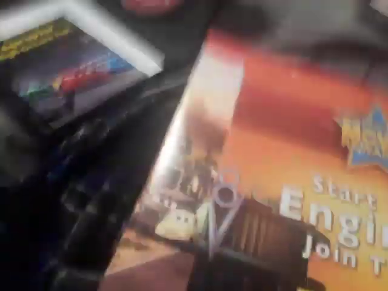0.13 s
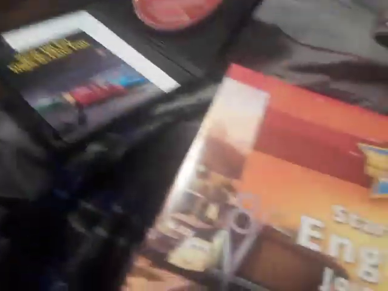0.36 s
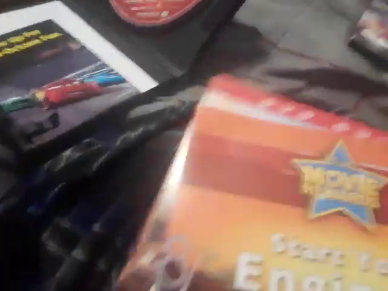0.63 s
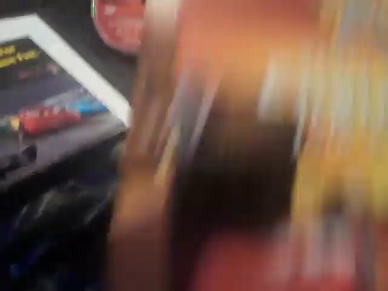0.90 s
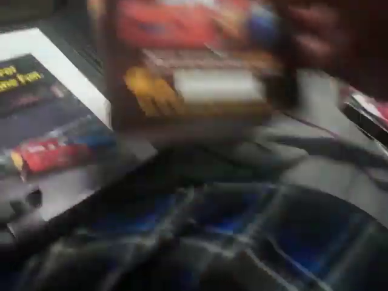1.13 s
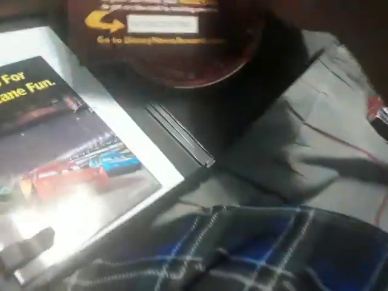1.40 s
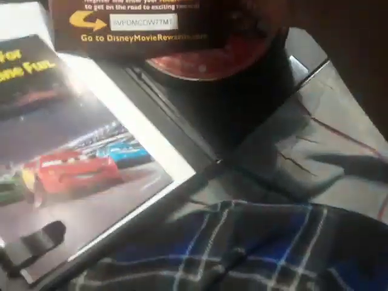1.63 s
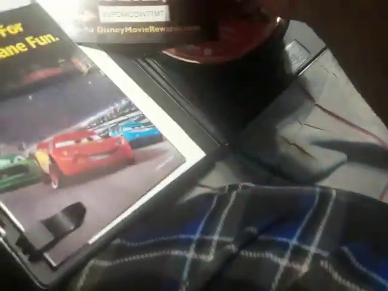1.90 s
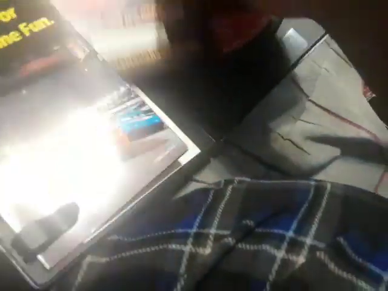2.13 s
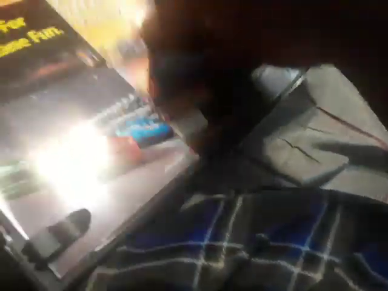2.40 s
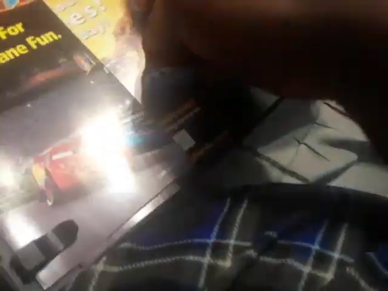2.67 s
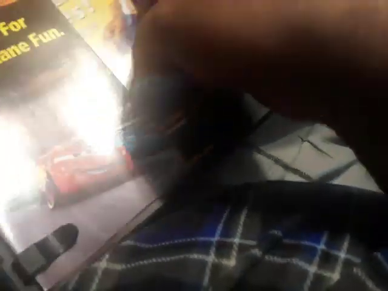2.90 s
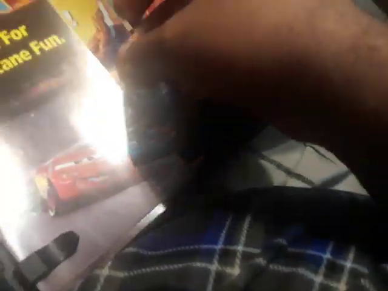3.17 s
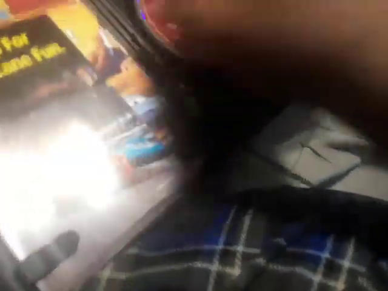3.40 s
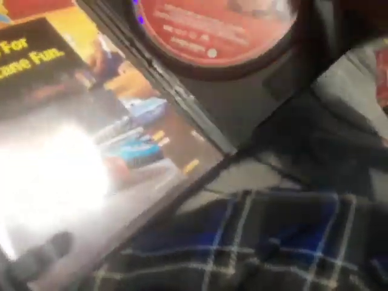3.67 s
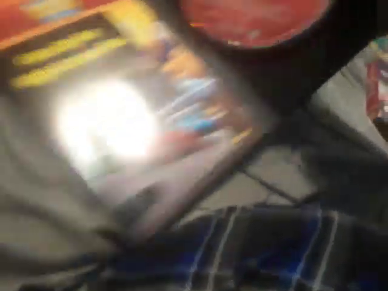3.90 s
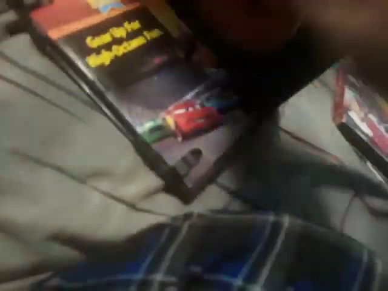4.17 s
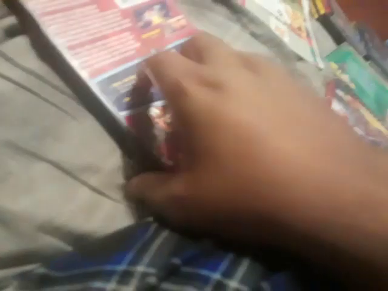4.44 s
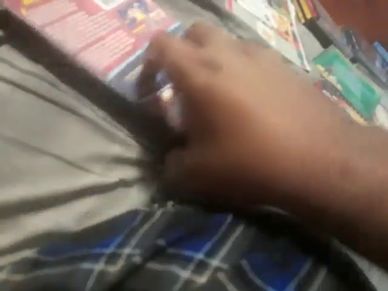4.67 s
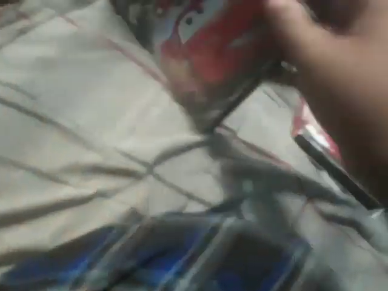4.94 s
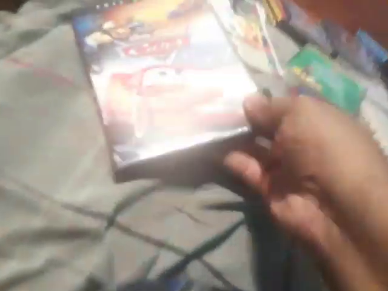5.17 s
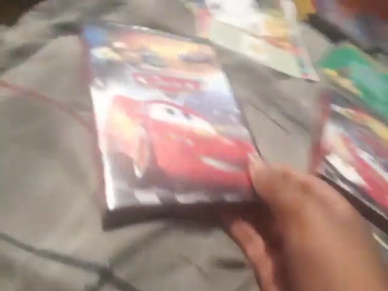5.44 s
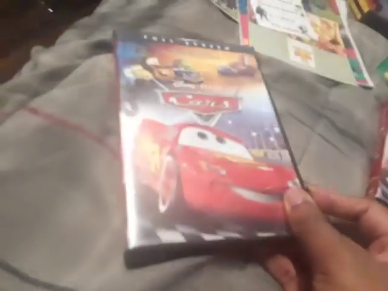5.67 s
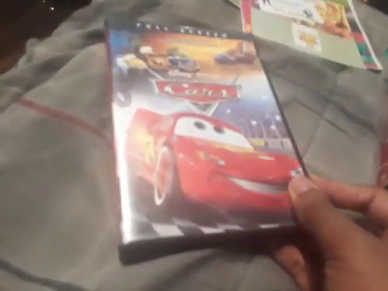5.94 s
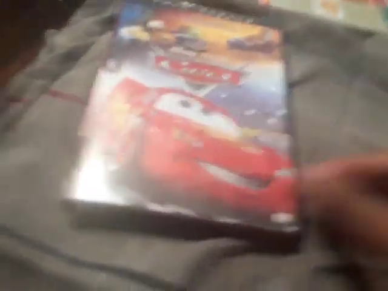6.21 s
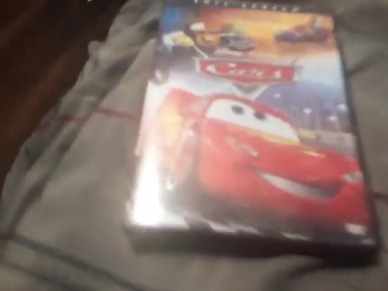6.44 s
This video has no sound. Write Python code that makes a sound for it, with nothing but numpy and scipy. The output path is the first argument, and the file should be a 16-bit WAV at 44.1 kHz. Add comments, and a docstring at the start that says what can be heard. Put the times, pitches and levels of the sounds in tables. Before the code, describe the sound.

Close-up plastic case handling indoors: low thumps, papery rustles, a dense flurry of clicks, one loud snap, then near quiet over faint hiss and whine.

```python
"""Paper hisses and a plastic case rattles as hands slide glossy inserts into it on a bed, then snap it shut.
Paper, cloth and rubbing are shaped noise; taps, scrapes and snaps are short noises ringing the case.
Fingers thump the camera body and the bed with low, sagging tones; a small furnished room answers.
The camera's left microphone faces the hands; the right one carries a thin wandering whine over hiss."""
import sys
import numpy as np
from scipy import signal
from scipy.fft import rfft, irfft, next_fast_len
from scipy.io import wavfile
from scipy.ndimage import uniform_filter1d, map_coordinates

SR = 44100
rng = np.random.default_rng(int(sys.argv[2]) if len(sys.argv) > 2 else 0)


def master_out(mix):
    """Clip the mix to full scale and print it as 16-bit PCM to the path in sys.argv[1]."""
    frames = np.transpose(np.atleast_2d(mix))
    ceiling = np.clip(frames, -1, 1)
    pcm = np.round(ceiling * 32767).astype(np.int16)
    wavfile.write(sys.argv[1], SR, pcm)


def linear_from_db(decibels):
    """Turn decibels (scalar or array-like) into linear amplitude factors; 0 gives 1."""
    return 10 ** (np.asarray(decibels, float) / 20)


N = 289806  # samples in the scene
HIT = 2048  # samples of one tap

# The hands at work; levels glide between rows, before the microphone's colour.
# Each row: time in seconds, cloth rumble in dB, rubbing of the case in dB.
HAND_LEVELS = [(0.0, -60.5, -74), (0.05, -46, -56.5), (0.09, -47, -51), (0.15, -43.5, -61),
               (0.175, -59, -63.5), (0.21, -45.5, -56), (0.24, -55.5, -68), (0.33, -63, -81),
               (0.53, -57.5, -64), (0.75, -56.5, -52), (0.95, -50, -60.5), (1.1, -68.5, -74.5),
               (1.46, -59.5, -61.5), (1.99, -57, -71), (2.34, -68, -59), (2.75, -65.5, -57),
               (3.1, -65.5, -58), (3.35, -58.5, -51.5), (3.65, -68.5, -84), (4.01, -68.5, -63),
               (4.22, -60, -60.5), (4.27, -52, -52), (4.34, -52, -51), (4.52, -58, -55.5),
               (4.68, -57.5, -52), (4.74, -68, -61), (4.8, -62.5, -63.5), (4.85, -75.5, -67),
               (5.02, -65, -72.5), (5.11, -80, -80), (5.5, -79.5, -88), (6.15, -81.5, -85), (6.3, -60, -78),
               (6.44, -75.5, -83), (6.57, -94, -74.5)]
# Paper strokes. Each row: start in seconds, rise in seconds, hold in seconds, level of the hold in dB.
PAPER_STROKES = [(0.031, 0.03, 0.082, -47.5), (0.293, .01, 0.046, -59.5), (0.451, 0.094, .01, -55.5),
                 (0.588, 0.011, 0.096, -48), (0.719, 0.027, 0.15, -47.5), (0.996, 0.02, 0.045, -49.5),
                 (1.209, 0.021, 0.0069, -54.5), (1.274, 0.024, 0.027, -59), (1.53, 0.0072, 0.12, -55.5),
                 (1.67, .03, 0.0079, -54), (1.724, 0.027, 0.041, -46), (1.845, 0.04, 0.019, -52),
                 (1.922, 0.11, 0.072, -52.5), (2.126, .045, .12, -45), (2.31, 0.062, 0.054, -43.5),
                 (2.446, 0.038, 0.0093, -41.5), (2.556, 0.043, 0.049, -45), (2.719, 0.017, 0.0046, -40),
                 (2.883, 0.047, .04, -42), (3.014, 0.025, 0.0074, -43), (3.312, 0.037, .01, -37.5),
                 (3.388, 0.039, 0.023, -49), (3.467, .01, 0.032, -58.5), (3.68, 0.029, 0.012, -57),
                 (3.801, 0.23, 0.022, -51), (4.164, 0.012, 0.031, -74.5), (4.234, .03, 0.063, -39),
                 (4.416, .018, 0.049, -45.5), (4.491, .01, 0.064, -58.5), (4.58, 0.083, .01, -46.5),
                 (4.8, 0.098, 0.23, -58), (5.45, 0.013, 0.0068, -65), (6.0, 0.073, 0.23, -61.5)]
# Taps and clicks on the case. Each row: start in seconds, peak of the case's ring in dB,
# strongest ring in Hz, low knock in dB and bright crack in dB, both against that ring.
CASE_TAPS = [(0.106, -33.5, 900, -14.5, -15.5), (0.116, -39.5, 1500, -7.5, -1),
             (0.2133, -42, 7110, -31.5, 19), (0.254, -39.5, 7110, -32, 0.5), (0.3198, -40.5, 849, -18, 4.5),
             (0.339, -45.5, 1300, 3.5, -12), (0.68, -29, 2105, -31.5, -9.5),
             (0.689, -42, 2099, -30.5, -4.5), (0.7289, -33, 2000, -12.5, -16.5),
             (1.064, -33.5, 1707, -12, -4), (1.5703, -38.5, 2344, -12.5, -4), (1.7445, -36, 1800, -4, 1),
             (2.161, -51.5, 7110, -32.5, 9.5), (2.207, -44.5, 4490, -31, 5),
             (2.334, -38.5, 1340, -13, -3.5), (2.3536, -24.5, 2268, -19, -22.5),
             (2.372, -22, 1260, -22, -27), (2.4197, -31.5, 2320, -41.5, -10),
             (2.4798, -34.5, 1836, -16, 4.5), (2.4893, -27, 4490, -5.5, 3.5), (2.619, -31, 3510, -40, -22),
             (2.6654, -24.5, 2240, -20.5, -12), (2.7381, -31, 1786, -42.5, -7),
             (2.7457, -24.5, 1910, -26, -4.5), (2.755, -31, 4490, -29.5, -11.5),
             (2.9108, -26.5, 1883, -26.5, -33), (2.983, -29, 1910, -14.5, -24),
             (3.238, -41, 1880, -20, -20), (3.2524, -36.5, 1720, -8.5, -26),
             (3.273, -35, 1800, -15.5, -21.5), (3.277, -34, 1900, -17.5, -17), (3.295, -33, 2110, -15, -12),
             (3.323, -27.5, 1875, -14, -21), (3.3648, -25, 1820, -18, -0.5),
             (3.402, -34.5, 1800, -19.5, -6.5), (3.427, -28.5, 1520, -28.5, -7.5),
             (3.4462, -28, 1730, -10.5, -21.5), (3.642, -21.5, 2266, -19.5, -20.5),
             (3.6522, -23, 2269, -11.5, -7.5), (3.733, -24, 2230, -11, -33.5),
             (4.245, -25, 1044, -12.5, -18.5), (4.2531, -18, 1700, -11, -23.5),
             (4.285, -19, 1300, -13, -15), (4.2883, -19, 1502, -14.5, -12),
             (4.2927, -18.5, 1143, -13, -12.5), (4.2984, -25, 3173, -15, 3), (4.332, -28.5, 1650, -9, -0.5),
             (4.4019, -19, 1300, -16, 2.5), (4.406, -18.5, 950, -15.5, -4.5), (4.411, -24, 1700, -15, -7),
             (4.4331, -23, 1007, -14.5, -7.5), (4.439, -26, 950, -15.5, -20.5),
             (4.47, -34, 950, -11.5, -13), (4.4755, -28, 920, -8, -9), (4.484, -28.5, 950, -19.5, -19.5),
             (4.582, -39, 2056, -21, -20.5), (4.6037, -35.5, 942, -12, -24), (4.701, -30, 951, -18, -13.5),
             (4.784, -44.5, 884, -20.5, -26.5), (4.884, -38, 934, -30.5, 1),
             (4.888, -36.5, 949, -20.5, -23), (4.9724, -38, 963, -16.5, -22), (5.063, -45, 950, -23, -27),
             (5.396, -41.5, 1603, -45, 9), (5.486, -58, 2316, -28, -21), (5.548, -57, 1720, -40, -24),
             (5.5675, -47, 1458, -41, -21), (6.2, -50.5, 1905, -34, 9), (6.2454, -36.5, 2120, -25.5, -42.5)]
# Short scrapes of edges and the case, and small soft knocks near 950 Hz. Each row: start in seconds,
# length in seconds, level before the swell in dB, strongest ring in Hz, treble against the ring in dB.
SCRAPES_AND_KNOCKS = [(0.564, 0.2, -49, 6670, -13.5), (0.812, 0.018, -40, 1740, -13.5),
                      (1.011, 0.041, -52, 1784, 11.5), (1.751, 0.045, -44.5, 1953, 0),
                      (2.458, 0.05, -42.5, 1770, -16.5), (2.569, .056, -51, 2380, 1),
                      (2.74, 0.015, -37.5, 4482, 5), (2.894, 0.089, -42.5, 1820, 3.5),
                      (3.017, 0.055, -40, 1880, 1), (3.258, 0.058, -44, 1917, -5.5),
                      (3.328, 0.042, -31, 1705, -4), (3.375, 0.033, -42, 1743, -15.5),
                      (3.417, 0.045, -40.5, 2375, -1), (3.43, 0.036, -39.5, 3567, -7),
                      (4.256, 0.062, -31, 1466, -11), (4.316, 0.017, -31, 1760, 2.5),
                      (4.327, 0.017, -29.5, 1680, -33.5), (4.405, 0.019, -29.5, 981, -18),
                      (4.429, 0.022, -32, 993, -15), (4.463, 0.034, -34.5, 1312, -5.5),
                      (4.541, 0.032, -44.5, 950, -22), (4.651, 0.021, -45, 950, -17.5),
                      (4.904, 0.019, -48, 950, -25.5), (5.01, 0.022, -50.5, 950, -22)]
# Bands of noise that glide, swell and fade: rubbed edges, sliding paper, cloth, a snap's tail.
# Each row: start in seconds, length in seconds, level before swell and fade in dB, first pitch in Hz,
# pitch it heads for in Hz, width in Hz, swell in seconds, fade in seconds.
NOISE_BANDS = [(0.421, 0.53, -56.5, 2155, 2104, 550.6, .067, 0.11),
               (.59, 0.1, -56, 5600, 5470, 600, 0.0096, 0.037),
               (.6, 0.091, -54, 6600, 7330, 901, 0.0083, 0.026),
               (.73, 0.11, -57.5, 5300, 5935, 449, .03, 0.023),
               (.735, 0.065, -56.5, 6800, 6870, 600, .02, 0.014),
               (.76, .14, -57, 8300, 7510, 800, 0.025, 0.035),
               (2.15, 0.19, -54, 4100, 4600, 600, .015, 0.049),
               (2.16, .14, -55.5, 7300, 7380, 448, 0.039, 0.026),
               (2.34, .08, -63.5, 6600, 6600, 397.3, 0.025, 0.038),
               (2.735, .03, -44.5, 4400, 4390, 500.4, 0.0081, 0.011),
               (2.9, .06, -49.5, 4300, 4430, 694.6, .01, 0.037),
               (3.335, 0.032, -43.5, 4700, 4860, 400, 0.0081, 0.009),
               (3.449, 0.12, -60.5, 2010, 2014, 299, 0.067, 0.066),
               (4.49, .2, -54.5, 380, 327.6, 350, 0.024, 0.0463),
               (4.97, 0.097, -59, 350, 350, 300, 0.011, .04),
               (4.5, 0.36, -57.5, 2055, 2043, 281.5, 0.061, 0.14),
               (5.8, 0.1467, -49.5, 2300, 2030, 1390, 0.0092, 0.17),
               (5.803, 0.13, -59, 7900, 7700, 907, .005, .11),
               (5.807, 0.012, -38.5, 2020, 2027, 296, .005, 0.0057),
               (6.2445, 0.061, -41, 2250, 1810, 553.4, 0.0012, 0.029),
               (6.25, 0.16, -46, 3700, 3338, 270, .05, 0.12),
               (6.25, .14, -52, 3300, 3000, 2000, 0.025, 0.0827),
               (6.288, 0.1, -54, 2050, 2050, 300, 0.021, 0.05)]
# Sharp snaps. Each row: start in seconds, near peak in dB, tilt in dB an octave, rattle t60 in seconds,
# peak sent into the room in dB, strongest ring in Hz, boost of that ring in dB.
CASE_SNAPS = [(0.186, -19, -3, .006, -53, 1210, 11), (0.2174, -13.5, -2, 0.016, -48, 1740, 3),
              (0.7362, -28, -3.5, 0.0052, -50, 1918, 6), (0.904, -18.5, -2.3, .005, -47, 2036, 9),
              (1.5423, -27, -2.8, .008, -49.5, 2200, 14), (3.0275, -23, -6, 0.0054, -52, 1190, 11),
              (5.1487, 6.5, 0, 0.0092, 12, 4530, 6), (5.796, -7.5, -0.5, 0.01, -17, 1590, 5.5)]
# Soft thumps on the camera body and the bed. Each row: start in seconds, level before the bass cut in dB,
# pitch it sags to in Hz, left over right in dB, t60 in seconds.
SOFT_THUMPS = [(0.025, -5, 239.8, 22.5, 0.023), (0.03, -22, 108.4, 14, 0.084), (0.044, -26, 203, 13, 0.012),
               (0.053, -11.5, 147.7, 26, 0.066), (0.05, -26, 422, 11.5, 0.038),
               (0.065, -28, 297.2, 11, 0.047), (0.081, -27.5, 348, 24, 0.064),
               (0.102, -34.5, 247, 16, 0.028), (0.117, -23, 375, 16.5, 0.047),
               (0.13, -3.5, 173.5, 9.5, 0.037), (0.133, -14, 104.5, 11.5, 0.061),
               (0.14, -24, 474, 8, 0.033), (0.145, -17.5, 278.1, 3, 0.048), (0.153, -10, 170.2, 11, 0.044),
               (0.186, -11, 278, -1.5, 0.028), (0.197, -26, 170.7, 2.5, 0.063),
               (0.208, -24, 190, 5.5, 0.04014), (0.214, -20, 380.2, 5.5, 0.02226),
               (0.349, -38.5, 164, 7, 0.061), (0.853, -11.5, 297.4, 30, 0.016),
               (0.936, -36.5, 149.2, 3.5, 0.056), (1.026, -31, 195.8, 2.5, .05),
               (2.492, -36.5, 211, 18.5, 0.056), (2.986, -38, 208, 10.5, 0.051),
               (3.337, -43.5, 379.2, 7, .054), (3.737, -36.5, 334.6, 9.5, 0.043),
               (4.259, -34, 309, 20, 0.048), (4.281, -20, 180, 13, 0.065), (4.475, -36.5, 250, 6.5, 0.038),
               (4.545, -39.5, 322.7, 12, 0.042), (4.646, -37.5, 251.8, 8.5, 0.048),
               (4.985, -45, 350, 10, 0.044), (5.0, -49.5, 328, 10.5, 0.041), (5.02, -47.5, 387, 2, .05),
               (5.156, -28, 322.6, 10, 0.063), (5.46, -53, 147.2, 0.5, 0.055),
               (5.654, -38, 154.6, 35, 0.043), (6.245, -37, 158.9, 13, 0.031), (6.27, -36, 126, 25, 0.047)]
# What the case rings with. Each row: pitch in Hz, width in Hz, level in dB.
CASE_MODES = [(950, 160, 0.5), (1300, 250, -3), (1700, 270, -1), (2240, 250, 0.5), (2538, 460, -5),
              (3173, 262, -5), (3813, 430, -5), (4490, 510, -7), (5090, 470, -8.5), (7110, 1400, -13)]
# Colour of the paper's hiss. Each row: frequency in Hz, level in dB per Hz.
PAPER_COLOUR = [(600, -44.5), (1500, 2.5), (3000, -1.5), (5000, -2), (8000, 1.5), (12000, 0.5), (16000, -8)]
# Colour of the cloth's rumble. Each row: frequency in Hz, level in dB per Hz.
CLOTH_COLOUR = [(25, -47.5), (60, -12.5), (130, -2), (300, -6.5), (480, -8), (700, -16), (1500, -35)]
# Colour of a snap up close, before its tilt and boost. Each row: frequency in Hz, level in dB per Hz.
SNAP_NEAR_COLOUR = [(60, -53), (150, -30), (400, -34.5), (800, 1), (1300, 1), (2200, 4), (2700, -2),
                    (3050, 4.5), (3500, -7), (4470, 3), (5400, -9), (7300, 4.5), (8500, -7), (10500, -8.5),
                    (12500, 0), (16000, 0)]
# Colour of a snap as the room receives it, before tilt and boost. Each row: frequency in Hz, level in dB per Hz.
SNAP_ROOM_COLOUR = [(100, -24), (240, -12.5), (480, -12), (620, -24), (760, -9), (950, 0.5), (1170, -14),
                    (1620, 3), (1800, -6.5), (2030, 1), (2600, -7), (3100, -4.5), (4400, -7), (5600, -5.5),
                    (7500, -5), (12500, -11), (16000, -12)]
# Right microphone against left. Each row: frequency in Hz, level in dB.
RIGHT_SHADOW = [(100, -4.5), (300, -12.5), (1000, -12.5), (3000, -14.5), (8000, -15), (15000, -21.5)]
# Share of the hands' sound common to both microphones. Each row: frequency in Hz, share from 0 to 1.
COMMON_SHARE = [(100, 0.6), (400, 0.58), (1200, 0.3), (4000, 0.05), (15000, 0.05)]
# How long the room rings. Each row: frequency in Hz, t60 in seconds.
ROOM_DECAY = [(150, 0.26), (1000, 0.33), (4000, 0.29), (12000, 0.23)]
# Colour of the microphones' hiss. Each row: frequency in Hz, level in dB per Hz.
HISS_COLOUR = [(25, -6.5), (60, 17.5), (150, 9.5), (300, -4), (600, 12.5), (2000, 19), (4500, 2.5),
               (9000, -3.5), (13000, -4.5), (15500, 1.5)]
# Partials of the whine. Each row: multiple of its pitch as a plain number, level in dB.
WHINE_PARTIALS = [(1, 0.5), (2, -13.5), (3, -44.5)]
# Whine and hiss sink after the loudest blows, at set times.
# Each row: time in seconds, level of both in dB, centre of the whine's pitch in Hz.
SELF_NOISE = [(0, 1, 1407), (.3, 1.5, 1394), (.5, 0, 1397), (5.14, 1, 1359), (5.2, -4, 1315),
              (6.15, -5.5, 1298), (6.3, 0, 1310), (6.42, 0, 1372), (6.485, -1, 1003), (6.52, -1, 1974),
              (6.531, -6, 703), (6.543, -0.5, 2342), (6.553, -6.5, 706), (6.57, 2, 950)]
# Colour of the microphones. Each row: frequency in Hz, level in dB.
MICROPHONE_COLOUR = [(25, -12.5), (70, 2), (3000, 0), (7500, -4), (8600, -5.5), (9300, -15), (10500, -15.5),
                     (12500, -12.5), (15500, -12.5)]

RISE_DB, FADE_DB_PER_S = 17.5, 440  # a stroke climbs this far to its hold, then dies away
# tiny creases of the sliding paper: rate, level against its hiss, spread of sizes
CRACKLES_PER_S, CRACKLE_DB, CRACKLE_SPREAD_DB = 500, -11, 4
PATCH_DB = 4  # bends of the sheet brighten some bands of its hiss for a tenth of a second
TAP_T60_S = 0.026  # rattle after a contact whose strongest ring is 2000 Hz
RATTLE_LAW = -0.082  # a deeper ring rattles longer: t60 goes with pitch to this power
CRACK_SHARE = 0.65  # the treble crack dies in this share of the rattle's time
# the bed's answer to a tap: typical pitch, width as a share of pitch, spread of pitch (log)
KNOCK_HZ, KNOCK_WIDTH, KNOCK_SPREAD = 350, 0.617, .15
GLIDE_S = .08  # time constant of a noise band's glide
SNAP_RIGHT_DB = -3  # a snap faces the left microphone more than the rest does
SAG, SAG_S = 0.24, 0.0054  # a thump starts this share higher and sags with this time constant
THUMP_RISE_S = 0.0026
TICK_DB, TICK_T60_S, TICK_HZ = -26, 0.06, 600  # the fingertip's tick, against its thump
LAG = 2  # samples by which the right microphone hears the hands later
WALL_GAP_S, NEAR_ECHO_DB = 0.0066, -11.5  # the walls' delay; bed and hands answer before them
TOP_HZ, TOP_DB_PER_KHZ = 15900, 30  # the recorder's band edge and the slope above it


def unit(x):
    """x at rms 1 along its last axis."""
    return x / np.sqrt(np.mean(x ** 2, axis=-1, keepdims=True) + 1e-20)


def peak(x):
    """x at peak 1."""
    return x / abs(x).max()


def along(points, hz):
    """Reads (Hz, value) points on a log axis."""
    f, v = np.transpose(points)
    return np.interp(np.log(hz + 1), np.log(f + 1), v)


def curves(rows):
    """One value per sample for each column after the time."""
    s, *cols = np.transpose(rows)
    return [np.interp(np.arange(N) / SR, s, c) for c in cols]


def wobble(rate):
    """A smooth random curve, rate knots a second."""
    return map_coordinates(rng.standard_normal(N // 20), [np.arange(N) * rate / SR])


def filtered(x, response):
    """x times a complex response of frequency."""
    m = next_fast_len(x.shape[-1] + 4096)
    return irfft(rfft(x, m) * response(np.fft.rfftfreq(m, 1 / SR)), m)[..., :x.shape[-1]]


def coloured(x, points):
    """x shaped by a curve of (Hz, dB) points."""
    return filtered(x, lambda hz: linear_from_db(along(points, hz)))


def causal(db):
    """The minimum-phase response with these levels: its energy comes as early as it can."""
    ceps = irfft(np.log(linear_from_db(db)))
    half = len(ceps) // 2
    ceps[1:half] *= 2
    ceps[half + 1:] = 0
    return np.exp(rfft(ceps))


def add(out, s, sound):
    """Mixes a sound in at time s."""
    out[..., round(s * SR):][..., :sound.shape[-1]] += sound


def ring(f, hz, width):
    """One resonance: it swings most at hz, over a band of this width."""
    return 1j * f * width / (hz * hz - f * f + 1j * f * width + 1e-9)


def sign(hz):
    """Neighbouring modes swing in opposite directions; a ring takes the direction of the nearest."""
    return (-1) ** int(np.argmin([abs(np.log(row[0] / hz)) for row in CASE_MODES]))


def case(f, strong_hz=2000, tilt_db=0, scatter_db=np.zeros(len(CASE_MODES))):
    """The case's modes, weaker by tilt dB an octave away from the strongest ring, plus that ring."""
    total = 0.89 * sign(strong_hz) * ring(f, strong_hz, 0.0794 * strong_hz)
    for k, (hz, width, db) in enumerate(CASE_MODES):
        level_db = db + scatter_db[k] - tilt_db * abs(np.log2(hz / strong_hz))
        total = total + (-1) ** k * linear_from_db(level_db) * ring(f, hz, width)
    return total


def broad_ring(f, hz):
    """A broad resonance, as of something rubbed or dragged."""
    return sign(hz) * ring(f, hz, 0.19 * hz)


def bright(f):
    """The treble of a sharp contact."""
    return (1j * f / (4500 + 1j * f)) ** 2


def gritty(rate, depth_db):
    """Noise of rms 1 whose size catches and slips at about this rate a second."""
    return unit(rng.standard_normal(N) * linear_from_db(depth_db * wobble(rate)))


def crackle():
    """Sparse clicks of uneven size, rms 1."""
    struck = rng.random(N) < CRACKLES_PER_S / SR
    return unit(struck * rng.standard_normal(N) * linear_from_db(CRACKLE_SPREAD_DB * rng.standard_normal(N)))


def patchy(x):
    """x with random bands raised or lowered for a while."""
    z = signal.stft(x, nperseg=512)[2]
    field = uniform_filter1d(rng.standard_normal(z.shape), size=6, axis=0)
    field = uniform_filter1d(field, size=18, axis=1)
    return signal.istft(z * linear_from_db(PATCH_DB * field / field.std()), nperseg=512)[1][:N]


def strokes():
    """The gain of the sliding paper: each stroke rises, holds and fades."""
    t, gain = np.arange(N) / SR, 0
    for s, rise, hold, db in PAPER_STROKES:
        below_db = RISE_DB * np.clip(1 - (t - s) / rise, 0, 9)
        faded_db = FADE_DB_PER_S * np.clip(t - s - rise - hold, 0, 1)
        gain = gain + linear_from_db(db - below_db - faded_db)
    return gain


def hands():
    """Cloth rumbles, fingers rub the case into its modes, paper hisses and crackles as it slides."""
    cloth_db, rub_db = curves(HAND_LEVELS)
    cloth = unit(coloured(gritty(40, depth_db=2.5), CLOTH_COLOUR))
    rub = unit(filtered(gritty(120, depth_db=5.5), lambda f: case(f, 2100) + broad_ring(f, 1884)))
    sheet = gritty(300, depth_db=2) + linear_from_db(CRACKLE_DB) * crackle()
    slide = unit(coloured(patchy(sheet), PAPER_COLOUR))
    return linear_from_db(cloth_db) * cloth + linear_from_db(rub_db) * rub + strokes() * slide


def contact(hz, knock_db, crack_db, t60, tilt_db):
    """A blow with a short rattle: it rings the case at peak 1, knocks the bed and cracks in the treble."""
    fade = linear_from_db(-60 * np.arange(HIT) / SR / t60)
    blow, crack = rng.standard_normal((2, HIT))
    blow = blow * fade
    blow[0] = 6  # the first touch
    crack = crack * fade ** (1 / CRACK_SHARE)
    knock_hz = KNOCK_HZ * np.exp(KNOCK_SPREAD * rng.standard_normal())  # differs from spot to spot
    scatter_db = 3.9 * rng.standard_normal(len(CASE_MODES))
    rung = peak(filtered(blow, lambda f: case(f, hz, tilt_db, scatter_db)))
    knock = peak(filtered(blow, lambda f: ring(f, knock_hz, KNOCK_WIDTH * knock_hz) ** 2))
    return rung + linear_from_db(crack_db) * peak(filtered(crack, bright)) + linear_from_db(knock_db) * knock


def taps():
    """Close, dry contacts; the deeper the ring, the longer the rattle."""
    out = np.zeros(N + SR)
    for s, db, hz, knock_db, crack_db in CASE_TAPS:
        t60 = TAP_T60_S * (hz / 2000) ** RATTLE_LAW
        add(out, s, linear_from_db(db) * contact(hz, knock_db, crack_db, t60, tilt_db=4.5))
    return out[:N]


def scrapes_and_knocks():
    """Short scrapes and small soft knocks: gritty noise swells and fades in the case's modes."""
    out = np.zeros(N + SR)
    grit = unit(gritty(500, depth_db=2.5) + 0.51 * crackle())
    for s, length, db, hz, bright_db in SCRAPES_AND_KNOCKS:
        u = np.clip(np.arange(2 * HIT) / SR / length, 0, 1)
        noise = grit[round(s * SR):][:2 * HIT]
        # the last ring, at 330 Hz, adds a low body
        rung = filtered(noise, lambda f: case(f, hz, 2.5) + 0.85 * broad_ring(f, hz) + 0.67 * ring(f, 330, 170))
        sound = unit(rung) + linear_from_db(bright_db) * unit(filtered(noise, bright))
        add(out, s, linear_from_db(db) * np.sin(np.pi * u ** 0.71) ** 2 * sound)
    return out[:N]


def noise_bands():
    """Rough bands of noise around a gliding pitch: each swells and fades."""
    out = np.zeros(N + SR)
    for s, length, db, first_hz, last_hz, width, swell, fade in NOISE_BANDS:
        t = np.arange(round(length * SR)) / SR
        noise = rng.standard_normal((2, SR))[:, :len(t)]
        a, b = filtered(noise, lambda f: 1 / (1 + (2 * f / width) ** 2))
        hz = last_hz + (first_hz - last_hz) * np.exp(-t / GLIDE_S)
        phase = 2 * np.pi * np.cumsum(hz) / SR
        band = unit(a * np.cos(phase) + b * np.sin(phase))
        envelope = np.clip(np.minimum(t / swell, (length - t) / fade), 0, 1)
        add(out, s, linear_from_db(db) * envelope * band)
    return out[:N]


def snaps():
    """A clean broad crack: near, it rattles for a moment; the room receives it as one blow."""
    direct, sent = np.zeros((2, N + SR))
    hz = np.fft.rfftfreq(HIT, 1 / SR)
    for s, db, tilt_db, t60, room_db, ring_hz, ring_db in CASE_SNAPS:
        boost_db = ring_db * np.exp(-(np.log2(hz / ring_hz + 0.011) / 0.276) ** 2)
        tilt = tilt_db * np.log2(np.clip(hz, 100, 14000) / 2000) + boost_db
        blow = rng.standard_normal(HIT) * linear_from_db(-60 * np.arange(HIT) / SR / t60) * 0.34
        blow[0] = 1.0
        near = irfft(rfft(blow) * causal(along(SNAP_NEAR_COLOUR, hz) + tilt))
        add(direct, s, linear_from_db(db) * peak(near))
        clean = irfft(causal(along(SNAP_ROOM_COLOUR, hz) + tilt))
        add(sent, s, linear_from_db(room_db) * peak(clean))
    return direct[:N], sent[:N]


def thumps():
    """A soft push and a few low cycles that sag in pitch, felt mostly by the nearer microphone."""
    out, t = np.zeros((2, N + SR)), np.arange(HIT) / SR
    for s, db, hz, pan_db, t60 in SOFT_THUMPS:
        sagging_t = t + SAG * SAG_S * (1 - np.exp(-t / SAG_S))
        lag = np.array([[0], [1.6 + 0.685 * rng.standard_normal()]])  # radians, left and right
        swing = np.sin(2 * np.pi * hz * sagging_t - lag)
        swing = swing * linear_from_db(-60 * t / t60) * (1 - np.exp(-t / THUMP_RISE_S)) ** 2
        tick = rng.standard_normal(HIT) * linear_from_db(-60 * t / TICK_T60_S)
        tick = filtered(tick, lambda f: ring(f, TICK_HZ, TICK_HZ) ** 2)
        pan = linear_from_db([[min(pan_db, 0)], [min(-pan_db, 0)]])
        add(out, s, linear_from_db(db) * pan * (swing + linear_from_db(TICK_DB) * peak(tick)))
    # the microphones cut the deep bass
    return filtered(out[:, :N], lambda f: (1j * f / (70 + 1j * f)) ** 2)


def scattered(x):
    """x after a few milliseconds of bounces off hand and bed."""
    path = rng.standard_normal(400) * linear_from_db(-60 * np.arange(400) / SR / 0.00389)
    path[0] = 1.6
    return signal.fftconvolve(x, path / np.linalg.norm(path))[:N]


def both(x, other):
    """The right microphone hears the hands later, shadowed, and partly by another path."""
    share = lambda hz: np.clip(along(COMMON_SHARE, hz), 0, 1)
    right = filtered(x, share) + filtered(other, lambda hz: np.sqrt(1 - share(hz) ** 2))
    return np.array([x, np.roll(coloured(right, RIGHT_SHADOW), LAG)])


def room(x):
    """The walls answer after a short gap, each frequency dying at its own speed; new echoes for each stretch."""
    out, step = np.zeros((2, N + 2 * SR)), SR // 4
    for k in range(0, N, step):
        hz, t, z = signal.stft(rng.standard_normal((3, SR // 2)), SR, nperseg=256)
        share = np.clip(500 / (hz[:, None] + 1), 0, 1) ** 2 * 0.533  # the bass is more alike at both microphones
        z = np.sqrt(1 - share) * z[:2] + np.sqrt(share) * z[2]
        decay = linear_from_db(-60 * t / along(ROOM_DECAY, hz)[:, None])
        tail = signal.istft(z * decay, SR, nperseg=256)[1]
        before_walls = np.arange(tail.shape[1]) / SR < WALL_GAP_S
        tail = tail * np.where(before_walls, linear_from_db(NEAR_ECHO_DB), 1)
        echo = signal.fftconvolve(x[None, k:k + step], tail / np.linalg.norm(tail[0]), axes=1)
        add(out, k / SR + .002, echo)
    return out[:, :N] * linear_from_db([[-1], [-10]])


def whine(heard):
    """A lopsided tone of wavering level: its pitch darts about, and the sound heard there bends it."""
    drift_hz = 35 * wobble(30) + 90 * wobble(130) + 170 * wobble(1000)
    hz = curves(SELF_NOISE)[1] + drift_hz + 850000 * heard
    phase = 2 * np.pi * np.cumsum(np.clip(hz, 200, 3500)) / SR
    return -linear_from_db(wobble(55)) * sum(linear_from_db(db) * np.cos(k * phase) for k, db in WHINE_PARTIALS)


def self_noise(heard_right):
    """Hiss in both microphones, a little less in the right one, which also whines."""
    hiss = unit(coloured(rng.standard_normal((2, N)), HISS_COLOUR))
    own = linear_from_db(-64.0) * hiss * linear_from_db([[0], [-1]]) + linear_from_db(-54.0) * whine(heard_right) * [[0], [1]]
    return linear_from_db(curves(SELF_NOISE)[0]) * own


def scene():
    """Everything the hands do, near and through the room."""
    snap, sent = snaps()
    rustle, hits = hands(), taps() + scrapes_and_knocks() + noise_bands()
    near = both(rustle, hands()) + both(hits, scattered(hits))
    near = near + both(snap, scattered(snap)) * linear_from_db([[0], [SNAP_RIGHT_DB]])
    return near + room(sent + linear_from_db(-12.0) * (rustle + hits)) + thumps()


def band_limit(x):
    """A steep low-pass at the top of the band."""
    return signal.sosfilt(signal.butter(12, 17110, fs=SR, output="sos"), x)


def record(dry):
    """Microphone colour, self-noise and whine, then the recorder's band edge."""
    heard = coloured(dry, MICROPHONE_COLOUR) + self_noise(dry[1])
    heard = filtered(heard, lambda hz: linear_from_db(-TOP_DB_PER_KHZ * np.clip(hz - TOP_HZ, 0, None) / 1000))
    return band_limit(heard)


dry = scene()
out = record(dry)
master_out(out)
```